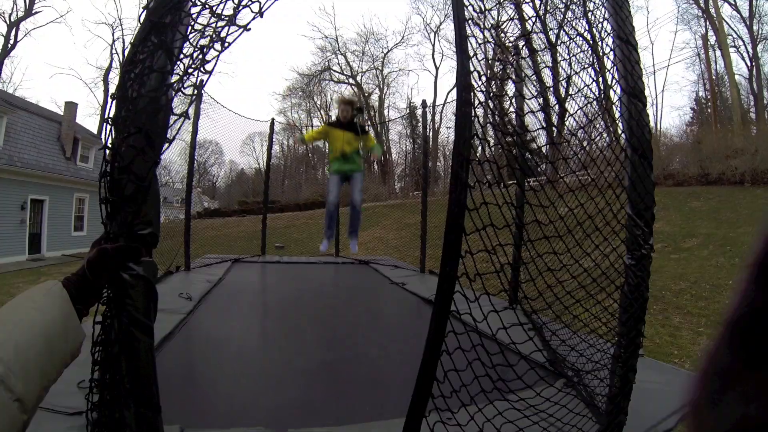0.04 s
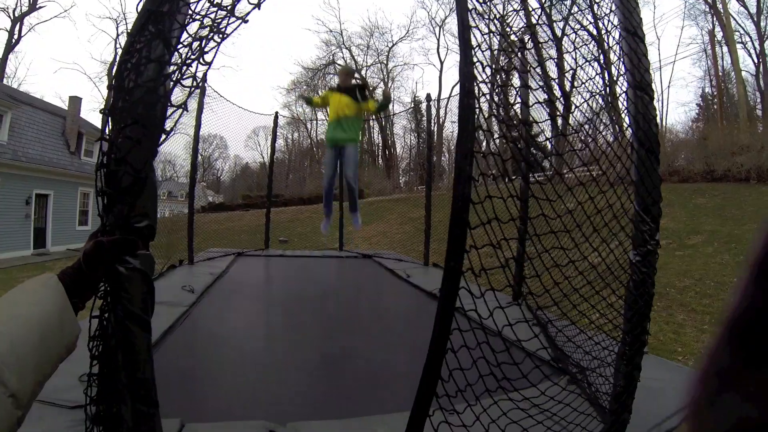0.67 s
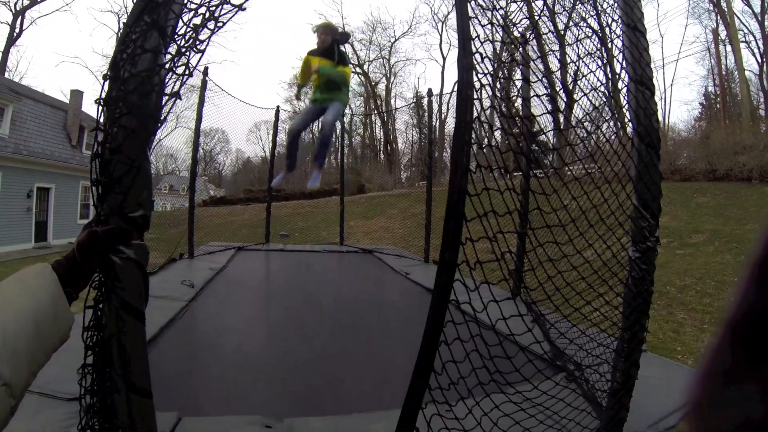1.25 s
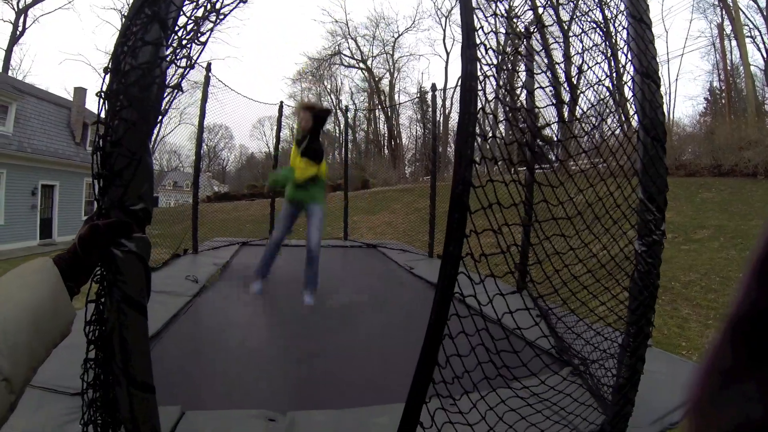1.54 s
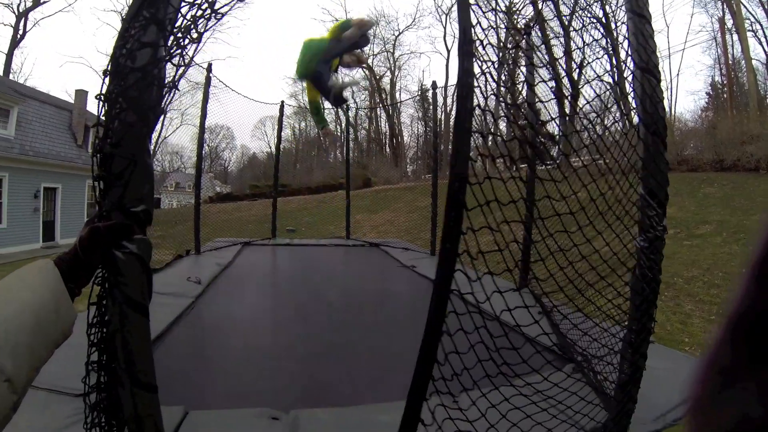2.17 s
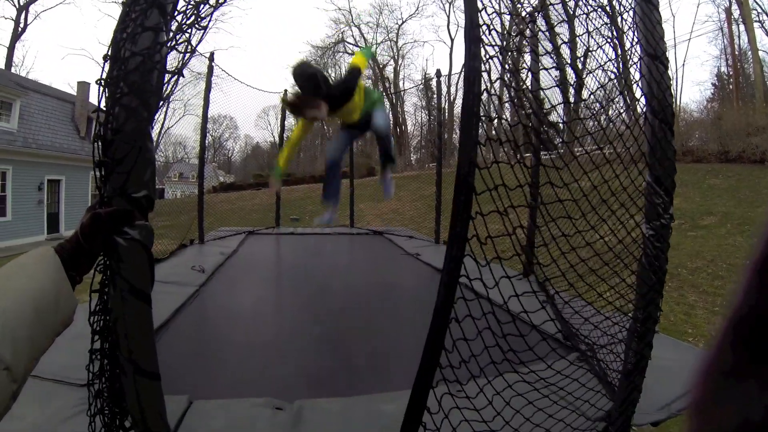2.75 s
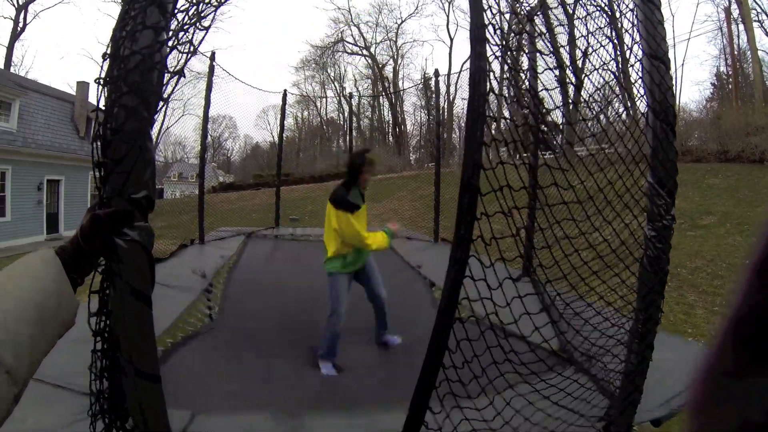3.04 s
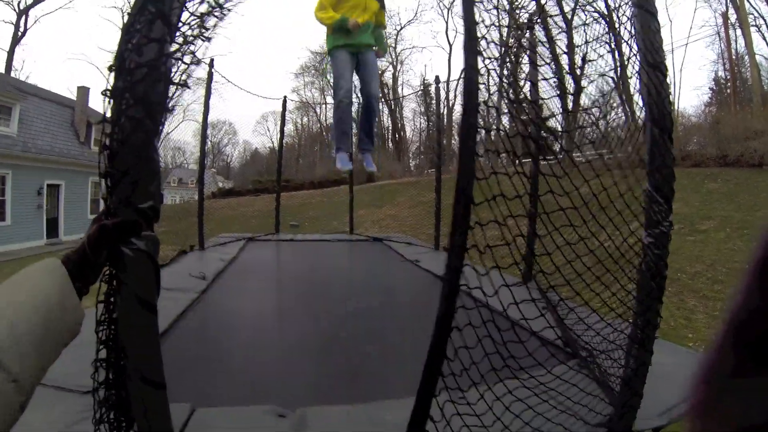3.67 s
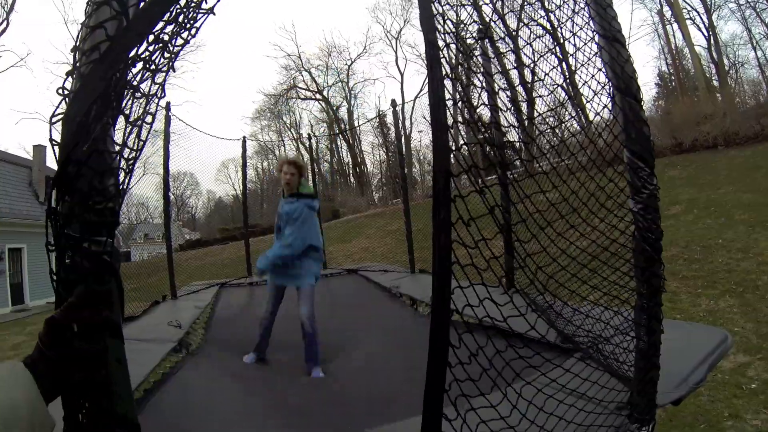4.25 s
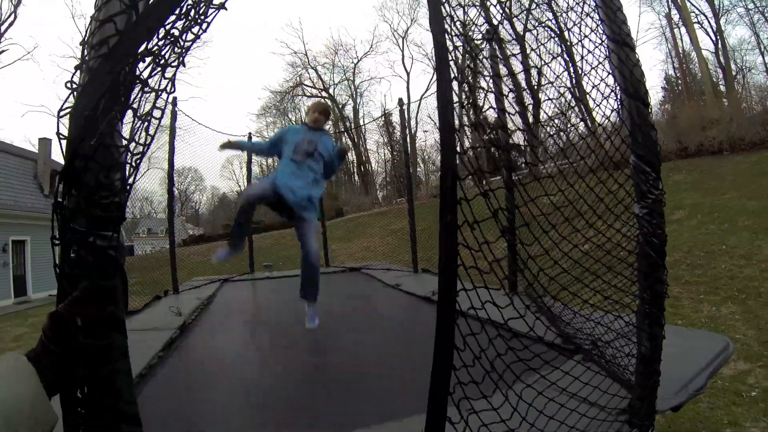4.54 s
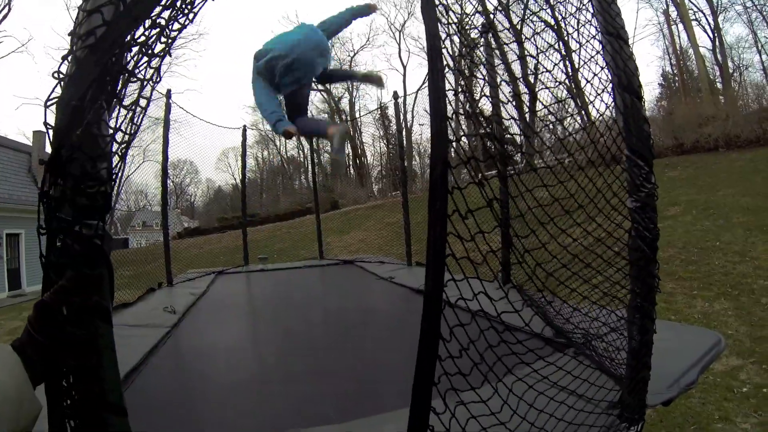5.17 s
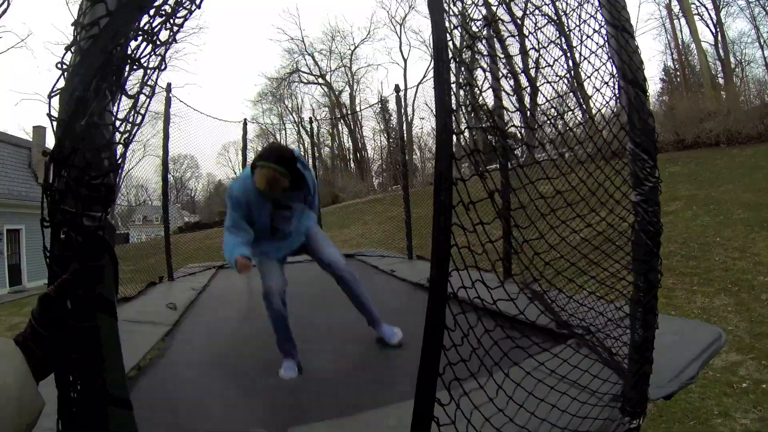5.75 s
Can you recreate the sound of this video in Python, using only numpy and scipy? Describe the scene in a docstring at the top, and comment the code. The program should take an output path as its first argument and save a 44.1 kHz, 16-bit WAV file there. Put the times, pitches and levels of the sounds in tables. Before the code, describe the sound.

A backyard trampoline is heard from a handheld microphone at the safety net, with light wind rumble and soft outdoor hiss throughout. The sound fades in on a gentle landing at about 0.1 seconds. Firmer landings follow at 1.5, 2.9, 4.2 and 5.4 seconds. Each lasts about half a second: socks scuff, the mat swishes and drums, the springs creak, and the frame and poles clack with a short metallic ring. Low thuds join at 1.6 seconds and in a dense rattle around 3 to 3.2. After take-offs the empty mat snaps back and shakes the springs, most clearly at 2 seconds. Small plastic ticks and faint, thin hook squeaks are scattered between. The sound dips for an instant at 3.8 seconds as a second jumper takes over. The loudest clacks and thuds come at 5.6 and 5.75 seconds, followed by a sharp tick.

```python
"""A backyard: two jumpers take turns on a trampoline, heard from a cased camera held at the safety net.
At each landing the mat swishes and drums, socks scuff, the stretching springs creak, and the frame and
net poles clack in their sockets, with a thud under the heaviest blows. After take-off the empty mat
snaps back and shakes the springs once more. Now and then a spring hook squeaks or the case ticks in
the hand, and light wind rumbles on the case throughout."""
import sys
import numpy as np
from scipy import signal
from scipy.fft import rfft, irfft, next_fast_len
from scipy.io import wavfile
from scipy.ndimage import uniform_filter1d, map_coordinates

SR = 44100
rng = np.random.default_rng(int(sys.argv[2]) if len(sys.argv) > 2 else 0)


def output_pcm(signal):
    """Save a mono or channel-first signal as 16-bit PCM at the path in sys.argv[1].

    Samples are clipped to [-1, 1] before scaling.
    """
    pcm = np.clip(np.atleast_2d(signal).T, -1, 1) * 32767
    wavfile.write(sys.argv[1], SR, np.round(pcm).astype(np.int16))


N = 260190
SECOND_JUMPER_S = 3.79  # when the second jumper's turn begins

# wind rumbling on the case: (frequency [Hz], level [dB])
WIND_SPECTRUM = [(8, -13.5), (22, 5), (40, -12.5), (70, -15.5), (120, -36), (250, -44), (800, -57.5),
                 (3000, -100)]
# the soft hiss of open air: (frequency [Hz], level [dB])
AIR_SPECTRUM = [(59, -32), (100, 1.5), (129, -1.5), (162, -3.5), (279, -7), (323, -15), (398, -8.5),
                (433, -12.5), (811, -14), (1160, -16), (1370, -14.5), (1520, -16), (9780, -32),
                (14900, -41.5)]
# the hand shifting on the case: (time [s], length [s], level [dB])
HAND_SHIFTS = [(1.207, 0.026, -43), (2.46, 0.065, -46.5), (3.556, 0.11, -40)]
# the dull rub of that hand: (frequency [Hz], level [dB])
HAND_SPECTRUM = [(20, -9), (60, -2.5), (130, -10.5), (220, -32), (600, -66), (2000, -102)]
# feet landing: (time [s], time on the mat [s], spring creak [dB], mat drumming [dB],
# fabric swish [dB], sock scuff [dB], scuff length [s])
LANDING_EVENTS = [(0.105, 0.48, -58, -56.5, -78.5, -82, 0.1), (1.498, 0.5, -50.5, -51, -65.5, -56.5, 0.058),
                  (2.85, 0.53, -49, -49.5, -67, -56, 0.17), (4.168, 0.47, -51.5, -57, -69.5, -50.5, 0.056),
                  (5.408, 0.59, -49.5, -53.5, -67, -55, 0.13)]
# the empty mat snapping back: (time [s], spring creak [dB], mat drumming [dB])
SNAP_BACKS = [(0.658, -62.5, -62.5), (2.002, -52.5, -51), (3.338, -63.5, -59.5), (4.668, -58.5, -76)]
# tones that frame and case ring at, with the first jumper: (pitch [Hz], width [Hz], level [dB])
FIRST_FRAME_TONES = [(540, 180, -19.5), (824, 180, -3), (1169, 123, -2), (1275, 76, 5), (1596, 60, -5),
                     (1980, 73, -12), (2650, 330, -13.5), (4380, 170, -19), (5090, 200, -23.5)]
# the same with the second jumper: (pitch [Hz], width [Hz], level [dB])
SECOND_FRAME_TONES = [(353, 82, -13.5), (735, 78, -5.5), (1128, 61, -4.5), (1272, 76, 2.5),
                      (1452, 75, -0.5), (1760, 63, -2.5), (1950, 230, -12), (2420, 57, -29),
                      (2675, 71, -11)]
# the plain sound of parts touching, with no ring: (frequency [Hz], level [dB])
CONTACT_SPECTRUM = [(100, -22), (450, -3.5), (850, -10.5), (1500, -2), (2900, -4), (4200, -29), (7000, -24),
                    (14000, -41)]
# the low thump of mat and frame: (frequency [Hz], level [dB])
THUMP_SPECTRUM = [(30, -41.5), (70, -0.5), (130, 2), (200, -4), (290, -5.5), (430, -11.5), (700, -25),
                  (1500, -44.5), (4000, -72)]
# the mat's threads rubbing: (frequency [Hz], level [dB])
WEAVE_SPECTRUM = [(1500, -9), (3300, 6.5), (4300, -1), (5300, 1), (6600, -9), (8400, -8.5), (11000, -12.5),
                  (14500, -24)]
# coiled springs ringing along: (pitch [Hz], width [Hz], level relative to what shakes them [dB])
COIL_TONES = [(1361, 34, -4.5), (2164, 35, -10), (2604, 60, -10), (3357, 12, -0.5), (3470, 23, -12),
              (3690, 16, -7), (4344, 22, -3.5), (5074, 68, -7), (5640, 70, -1), (8550, 29, 2),
              (9900, 25, -1)]
# socks brushing the mat: (frequency [Hz], level [dB])
SOCK_SPECTRUM = [(500, -22), (1100, -10), (1450, 0), (1900, -6), (2400, -3), (3100, -3), (3900, -14),
                 (5300, -19), (8000, -38), (14000, -55)]
# the weave rasping as it stretches: (time [s], length [s], level [dB])
WEAVE_RASPS = [(0.436, 0.063, -60.5), (1.526, 0.018, -54), (1.707, 0.0082, -45), (2.857, 0.081, -58.5),
               (2.981, 0.091, -54.5), (4.176, 0.018, -59), (5.47, 0.081, -56.5), (5.61, 0.02, -45.5)]
# the case ticking in the hand: (time [s], level [dB], pitch [Hz])
CASE_TICKS = [(0.2003, -43, 1230), (0.3454, -42, 1220), (1.0075, -37.5, 1760), (1.1243, -56, 1760),
              (1.1618, -52, 1660), (1.2293, -43.5, 1220), (1.4667, -48.5, 1910), (1.9571, -35, 1130),
              (2.4576, -37, 1625), (2.5025, -40, 1350), (3.56, -42, 1510), (3.683, -56, 1350),
              (3.706, -50.5, 1290), (5.8335, -28.5, 1360)]
# loose joints knocking; thump and scrape are turned up or down within each knock:
# (time [s], level [dB], thump [dB], scrape [dB], chatter length [s])
JOINT_CLACKS = [(0.28, -41, -1, -16, 0.006), (0.437, -44, 7.5, -5.5, 0.022), (0.679, -45.5, 6, -29, 0.0019),
                (1.647, -31.5, -1.5, -21, 0.012), (1.703, -37.5, 2, -15, 0.0086),
                (1.779, -33, -9, -11, 0.0037), (1.959, -40, -4, -38, 0.003), (1.845, -49, 6.5, -25, 0.003),
                (2.044, -42, 1.5, -35, 0.016), (2.903, -44, -7, -24, 0.001), (2.959, -39, 3, -32, 0.0039),
                (2.981, -32, -1.5, -36, 0.013), (3.003, -29.5, -1, -31, 0.0091),
                (3.035, -39, 4.5, -9.5, 0.026), (3.1438, -30, -8, -20, 0.003),
                (3.1484, -31, -5, -14, 0.0084), (3.213, -35.5, 3, -22.5, 0.006),
                (3.354, -39.5, 4, -20, 0.024), (4.303, -32, -4.5, -23.5, 0.0048),
                (4.365, -38, -3, -18, 0.0074), (4.441, -33.5, -4.5, -16.5, 0.0018),
                (4.482, -54, -20, -22, 0.0034), (4.575, -32.5, -4, -23.5, 0.0067),
                (4.701, -39.5, -3, -39, 0.002), (4.807, -52, -1, -33, 0.001), (5.603, -27, -4, -31, 0.0031),
                (5.612, -20.5, -12, -25, 0.0073), (5.655, -39, 6.5, -40, 0.0022),
                (5.713, -46, -15, -26, 0.001), (5.749, -22.5, -13.5, -17, 0.006),
                (5.817, -36.5, -22, -36, 0.0017)]
# the bright scrape in a knock: (frequency [Hz], level [dB])
SCRAPE_SPECTRUM = [(1500, -51), (3300, 12), (4300, 14), (4650, -5), (5200, 18.5), (6400, -34), (8400, -6),
                   (11000, -13), (14500, -61)]
# steel tubes ringing on: (pitch [Hz], level [dB], time to fade by 60 dB [s])
TUBE_TONES = [(1270, -17, 0.19), (1376, 10, 0.15), (1410, 3, 0.45), (2564, -2.5, 0.27), (2990, -6, 0.37),
              (3400, -3, 0.24), (3334, -2, 0.17), (3630, -11, 0.25), (4395, -8.5, 0.18), (5140, -9, 0.11)]
# spring hooks slipping on the frame: (time [s], length [s], pitch [Hz], level [dB])
HOOK_SQUEAKS = [(0.485, 0.057, 3400, -67), (1.89, 0.12, 3210, -61.5), (2.125, 0.033, 3310, -54.5),
                (4.542, 0.033, 3340, -46.5)]
# the frame thudding under the heaviest blows: (time [s], pitch [Hz], peak level [dB])
FRAME_THUDS = [(1.648, 221, -35), (2.980, 118, -29), (3.146, 148, -38), (3.212, 131, -37),
               (5.612, 310, -29.5), (5.749, 134, -28)]
# the sound opens softly and dips briefly once: (time [s], gain [0 to 1])
VOLUME_CURVE = [(0, 0), (.085, 0.012), (.16, 0.97), (3.72, 0.92), (3.792, 0), (3.86, 0.9), (5.9, 0.9)]


def amp(db):
    """Turn decibels into a number to multiply by."""
    return 10 ** (np.asarray(db) / 20)


def unit(x):
    """Scale a sound to an average strength (rms) of 1."""
    return x / np.sqrt(np.mean(x ** 2) + 1e-20)


def crest(x):
    """Scale a burst so that its loudest 3 ms have a strength of 1."""
    return x / np.sqrt(np.max(uniform_filter1d(x ** 2, size=132)) + 1e-20)


def wobble(rate):
    """A smooth curve through `rate` random values a second."""
    return map_coordinates(rng.standard_normal(int(N * rate / SR) + 4), [np.arange(N) * rate / SR])


def colour(points, size=8192):
    """A filter, stored as its answer to one click, that gives a sound the listed spectrum."""
    hz, db = np.transpose(points)
    log_hz = np.log(np.fft.rfftfreq(size, 1 / SR) + 1)
    log_gain = np.log(amp(np.interp(log_hz, np.log(hz), db)))
    cepstrum = irfft(log_gain)[:size // 2]
    cepstrum[1:] *= 2  # so that nothing sounds before the click
    response = irfft(np.exp(rfft(cepstrum, size)))[:size // 2]
    return response / np.linalg.norm(response)


def through(x, response):
    """Play x through a filter."""
    return signal.fftconvolve(x, response)[:len(x)]


def hiss(points):
    """Noise of strength 1 with the listed spectrum."""
    return unit(through(rng.standard_normal(N), colour(points)))


def grains(count, rate, spread_db):
    """Tiny clicks of uneven size at random moments, about `rate` a second."""
    hit = rng.random(count) < rate / SR
    direction = np.sign(rng.standard_normal(count))
    return hit * direction * amp(spread_db * np.clip(rng.standard_normal(count), -2, 2))


def swell(start, length):
    """A loudness curve that rises quickly and eases off."""
    progress = np.clip((np.arange(N) / SR - start) / length, 0, 1)
    return np.sin(np.pi * progress ** 0.46)


def envelope(start, rise_s, hold_s, fall_db_per_s):
    """A loudness curve that rises, holds, then dies away."""
    t = np.arange(N) / SR - start
    return np.clip(t / rise_s, 0, 1) * amp(-fall_db_per_s * np.maximum(t - rise_s - hold_s, 0))


def add(out, start, x):
    """Mix x into out, beginning at `start` seconds."""
    part = out[max(0, round(start * SR)):][:len(x)]
    part += x[:len(part)]


def wind_and_hand():
    """Light wind buffets the case, the grip shifts, and a soft hiss lies under everything."""
    breeze_db = np.where(np.arange(N) / SR < SECOND_JUMPER_S, -46, -42)
    gusts = amp(breeze_db + 1.96 * wobble(11)) * hiss(WIND_SPECTRUM)
    shifts = sum(amp(db) * swell(start, length) for start, length, db in HAND_SHIFTS)
    return gusts + shifts * hiss(HAND_SPECTRUM) + amp(-64) * hiss(AIR_SPECTRUM)


def mat_motion():
    """Loudness curves for creak, drumming and swish as the mat sinks, rises and snaps back."""
    creak, drum, swish = np.zeros((3, N))
    for start, contact_s, creak_db, drum_db, swish_db, _, _ in LANDING_EVENTS:
        progress = np.clip((np.arange(N) / SR - start) / contact_s, 0, 1)
        slack = 1 - np.sin(np.pi * progress)  # 0 when the mat is fully stretched
        touching = envelope(start, rise_s=0.03, hold_s=contact_s, fall_db_per_s=73)
        creak += touching * amp(creak_db - 14 * slack)
        drum += touching * amp(drum_db - 15.5 * slack)  # needs more stretch than the creak
        swish += amp(swish_db) * envelope(start, rise_s=0.094, hold_s=0.16, fall_db_per_s=48)
    for start, creak_db, drum_db in SNAP_BACKS:
        shaking = envelope(start, rise_s=0.019, hold_s=0, fall_db_per_s=58)
        creak += amp(creak_db) * shaking
        drum += amp(drum_db) * shaking
    return creak, drum, swish + amp(-80.5)  # net and fabric never quite rest


def frame_filter(tones, contact_db):
    """Frame and case answer a tap with a plain contact sound and tones; wider tones die sooner."""
    t = np.arange(4096) / SR
    ring = sum((-1) ** k * amp(db) * width * np.exp(-np.pi * width * t) * np.cos(2 * np.pi * hz * t)
               for k, (hz, width, db) in enumerate(tones))
    return ring / np.linalg.norm(ring) + amp(contact_db) * colour(CONTACT_SPECTRUM)


def springs_and_mat():
    """Stretched springs creak in many small slips, while the mat drums and its fabric swishes."""
    creak_gain, drum_gain, swish_gain = mat_motion()
    judder = wobble(70)  # all three sounds tremble together
    slips = grains(N, rate=1800, spread_db=3.5) * amp(3.2 * judder)
    first = unit(through(slips, frame_filter(FIRST_FRAME_TONES, contact_db=-2)))
    second = unit(through(slips, frame_filter(SECOND_FRAME_TONES, contact_db=-2)))
    creak = creak_gain * np.where(np.arange(N) / SR < SECOND_JUMPER_S, first, second)
    drum = drum_gain * amp(2.9 * judder) * hiss(THUMP_SPECTRUM)
    threads = grains(N, rate=4900, spread_db=6.5) * amp(2.2 * judder)
    swish = swish_gain * unit(through(threads, colour(WEAVE_SPECTRUM)))
    return creak + drum + swish


def coil_ring(shaking):
    """The springs pick up every knock and creak and sing on at their own pitches."""
    t = np.arange(SR // 5) / SR
    ring = sum(amp(db) * 2 * np.pi * width / SR * np.exp(-np.pi * width * t) * np.cos(2 * np.pi * hz * t)
               for hz, width, db in COIL_TONES)
    return through(shaking, ring)


def scuffs_and_rasps(zip_hz=2696):
    """Socks zip across the mat's threads with a hoarse tone, and the weave crackles as it stretches."""
    brush = hiss(SOCK_SPECTRUM)
    waver = 1 + 0.028 * wobble(900)
    grip = amp(2.5 * wobble(150))
    zip_tone = np.sin(2 * np.pi * np.cumsum(zip_hz * waver) / SR)
    scuffs = sum(amp(db) * swell(start, length) ** 2 for start, *_, db, length in LANDING_EVENTS)
    threads = grains(N, rate=2600, spread_db=4) * amp(2.7 * wobble(150))
    crackle = unit(through(threads, colour(WEAVE_SPECTRUM)))
    rasps = sum(amp(db) * swell(start, length) ** 2 for start, length, db in WEAVE_RASPS)
    return scuffs * grip * (0.8 * brush + zip_tone) + rasps * crackle


def case_ticks(ring_hz=1370):
    """The hand gives the case a small push, the plastic ticks, and the case rings briefly."""
    out, t = np.zeros(N), np.arange(SR // 25) / SR

    def pulse(peak_s, sharpness):
        return (t / peak_s * np.exp(1 - t / peak_s)) ** sharpness

    for start, db, hz in CASE_TICKS:
        tick = pulse(peak_s=0.0021, sharpness=9) * np.sin(2 * np.pi * hz * t)
        ring = amp(-9) * pulse(peak_s=0.0038, sharpness=8) * np.sin(2 * np.pi * ring_hz * t)
        push = amp(-27.5 + 0.3 * db) * pulse(peak_s=0.00095, sharpness=1)
        add(out, start, amp(db) * (tick + ring) - push)
    return out


def joint_clacks(rattle_fade_s=0.057):
    """A loose joint knocks in a quick chatter that thumps the frame and leaves the tubes ringing."""
    out, t = np.zeros(N), np.arange(SR // 4) / SR
    first = frame_filter(FIRST_FRAME_TONES, contact_db=-3)
    second = frame_filter(SECOND_FRAME_TONES, contact_db=-0.5)
    low, bright = colour(THUMP_SPECTRUM), colour(SCRAPE_SPECTRUM)
    for start, db, thump_db, scrape_db, chatter_s in JOINT_CLACKS:
        # a soft knock wakes only the low tones; a hard one is bright and sets the steel ringing
        hardness = np.clip((scrape_db + 40) / 25, 0, 1)
        soften = signal.butter(2, 1500 * 4 ** hardness, fs=SR)
        force = (1 - np.exp(-t / 0.00028)) * amp(-60 * np.maximum(t - chatter_s, 0) / rattle_fade_s)
        contacts = signal.lfilter(*soften, force * grains(len(t), rate=3500, spread_db=3))
        knock = crest(through(contacts, first if start < SECOND_JUMPER_S else second))
        thump = crest(through(force * grains(len(t), rate=2500, spread_db=9), low))
        # the fine scraping builds up a little after the first touch
        rubbing = (1 - np.exp(-t / 0.0097)) ** 2 * amp(-60 * np.maximum(t - chatter_s / 2, 0) / 0.035)
        scrape = crest(through(rubbing * grains(len(t), rate=7200, spread_db=9), bright))
        ring = steel_ring(t) * amp(-27 + 15 * hardness)
        clack = knock + amp(thump_db - 1) * thump + amp(scrape_db - 2.5) * scrape + ring
        add(out, start, amp(db - 4.5) * clack)
    return out


def steel_ring(t):
    """Many springs and tubes ring at once, so each tone drifts and no two knocks sound alike."""
    hz, db, fade_s = np.transpose(TUBE_TONES)[:, :, None]
    phase, strength = rng.standard_normal((2, len(TUBE_TONES), 1))
    drift = 0.012 * np.cumsum(rng.standard_normal((len(TUBE_TONES), len(t))), axis=1)
    tones = amp(db + 2 * strength - 60 * t / fade_s) * np.sin(2 * np.pi * (hz * t + phase + drift))
    return crest(tones.sum(axis=0) * (1 - np.exp(-t / 0.0041)))


def hook_squeaks():
    """A hook sticks and slips: a thin, rough tone with a faint one an octave above."""
    out = np.zeros(N)
    waver = 1 + 0.013 * wobble(650)
    roughness = amp(2.5 * wobble(300))
    for start, length, hz, db in HOOK_SQUEAKS:
        phase = 2 * np.pi * np.cumsum(hz * waver) / SR
        tone = np.sin(phase) + amp(-25) * np.sin(2 * phase)
        out += amp(db - 1.5) * roughness * swell(start, length) * tone
    return out


def frame_thuds(peak_s=0.0038):
    """A heavy blow gives the frame a few low shakes that the lawn stops at once."""
    out, t = np.zeros(N), np.arange(SR // 10) / SR
    pulse = t / peak_s * np.exp(1 - t / peak_s)
    for start, hz, db in FRAME_THUDS:
        add(out, start, amp(db) * pulse * np.sin(2 * np.pi * hz * t))
    return out


def scene():
    """Mix the trampoline, the case and the wind into one channel."""
    shaking = joint_clacks() + springs_and_mat()
    trampoline = shaking + coil_ring(shaking) + frame_thuds() + scuffs_and_rasps() + hook_squeaks()
    return (trampoline + case_ticks() + wind_and_hand())[None]


def record(dry):
    """The sound fades in and dips briefly once; the very highest treble is cut away."""
    times, gains = np.transpose(VOLUME_CURVE)
    faded = dry * np.interp(np.arange(N) / SR, times, gains)
    size, cutoff_hz = next_fast_len(N + SR // 2), 14500
    low_pass = 1 / (1 + (np.fft.rfftfreq(size, 1 / SR) / cutoff_hz) ** 80)
    return irfft(rfft(faded, size) * low_pass, size)[:, :N]


dry = scene()
out = record(dry)
output_pcm(out)
```